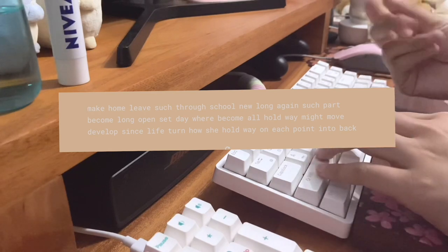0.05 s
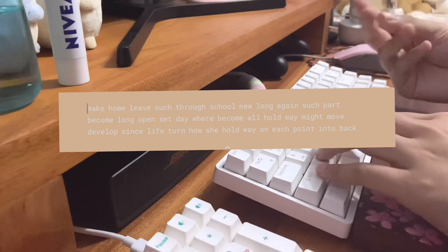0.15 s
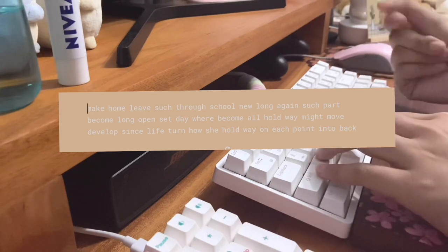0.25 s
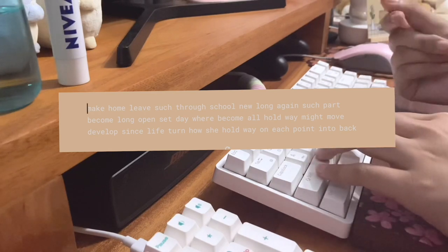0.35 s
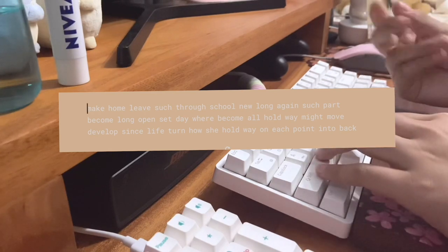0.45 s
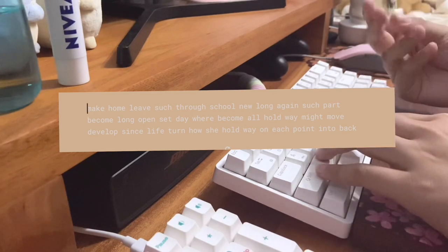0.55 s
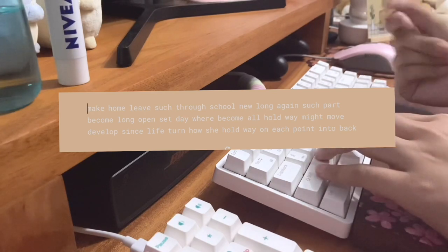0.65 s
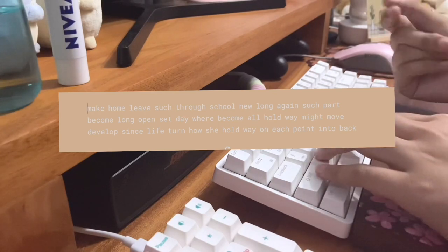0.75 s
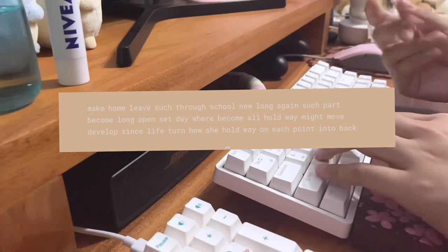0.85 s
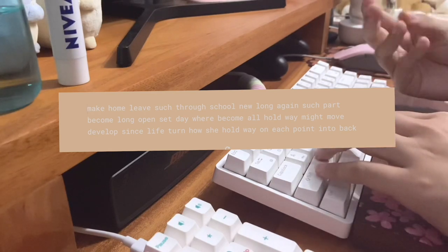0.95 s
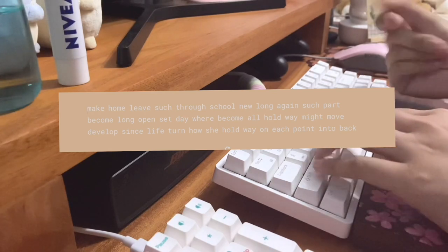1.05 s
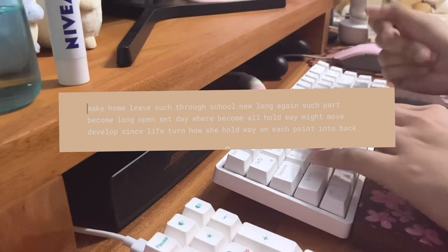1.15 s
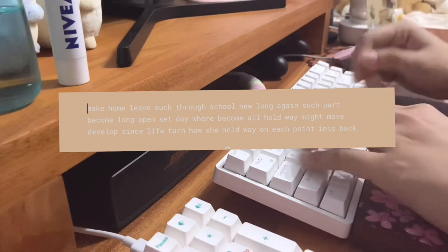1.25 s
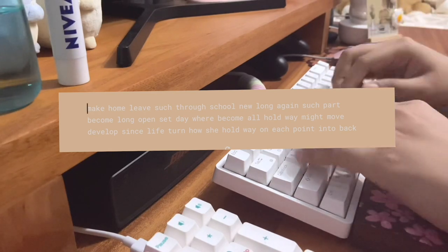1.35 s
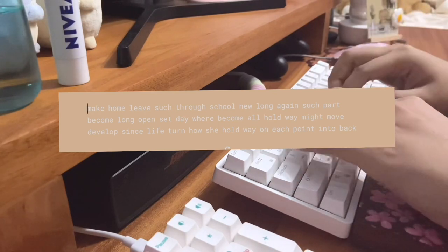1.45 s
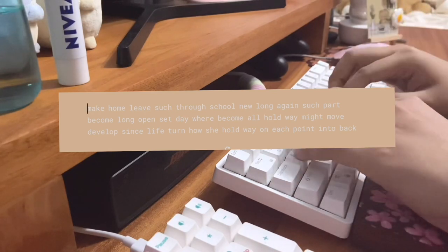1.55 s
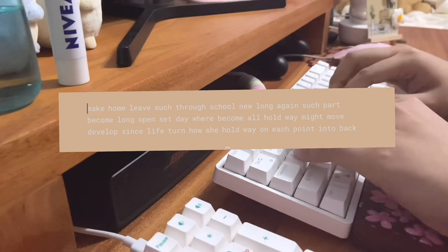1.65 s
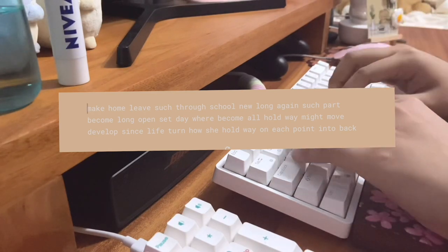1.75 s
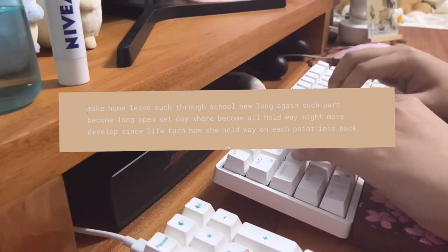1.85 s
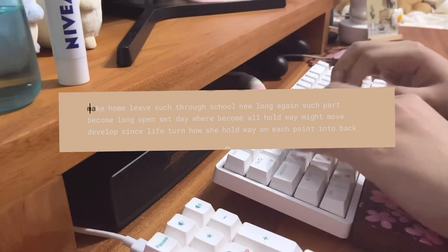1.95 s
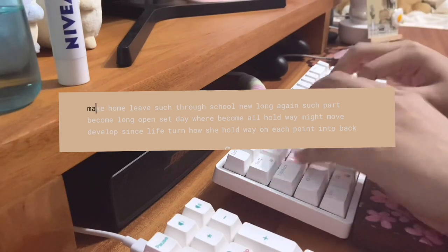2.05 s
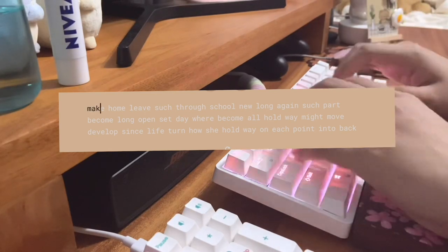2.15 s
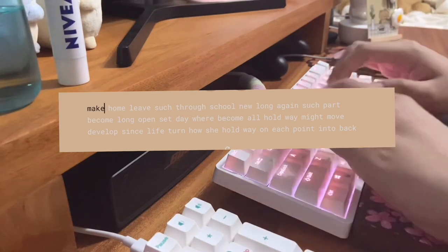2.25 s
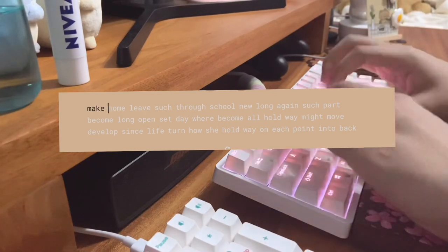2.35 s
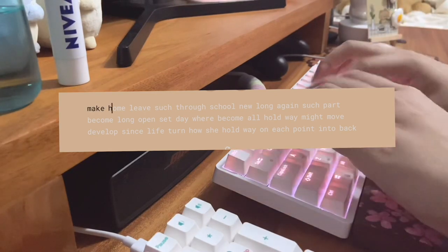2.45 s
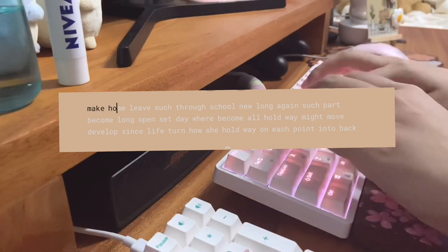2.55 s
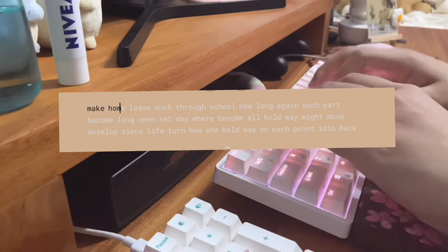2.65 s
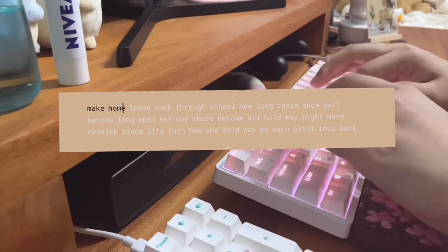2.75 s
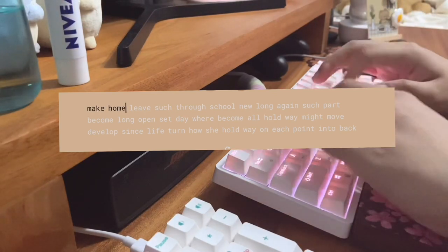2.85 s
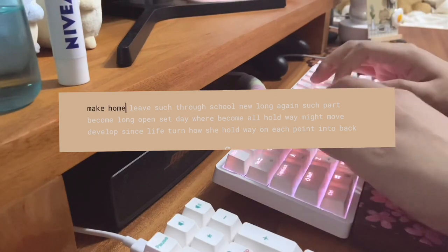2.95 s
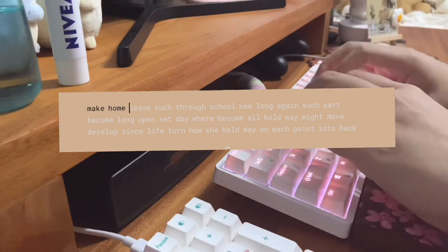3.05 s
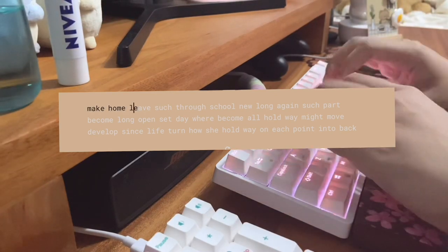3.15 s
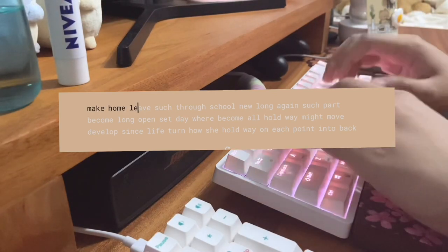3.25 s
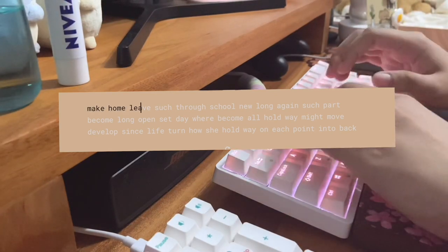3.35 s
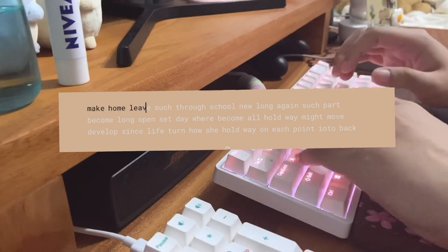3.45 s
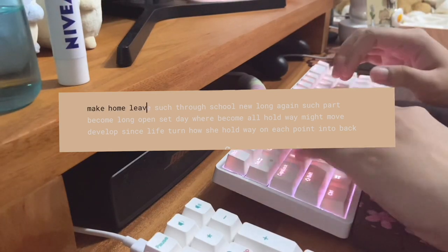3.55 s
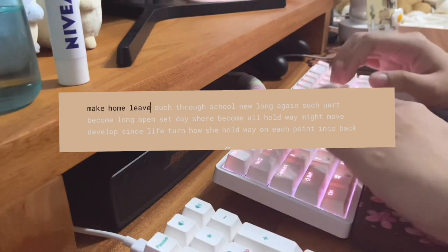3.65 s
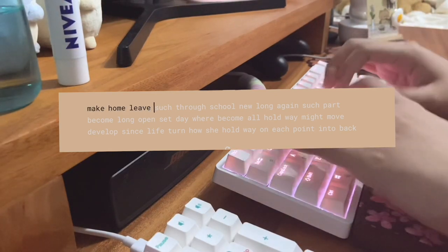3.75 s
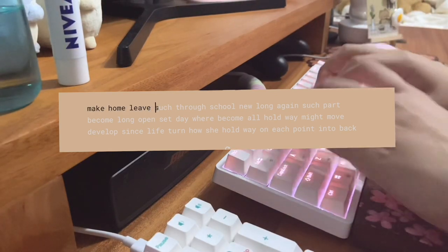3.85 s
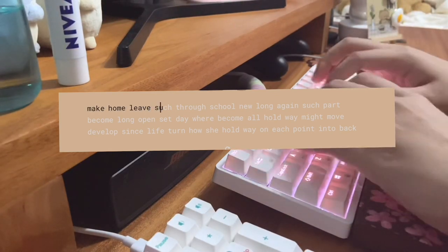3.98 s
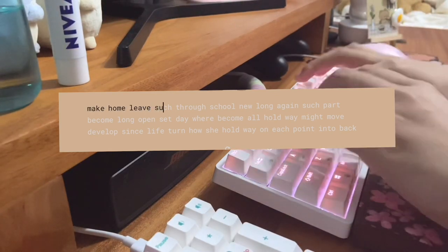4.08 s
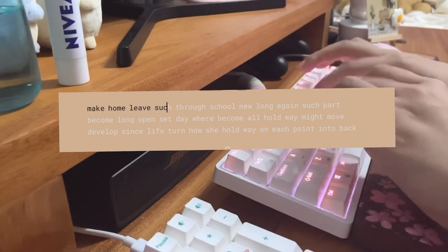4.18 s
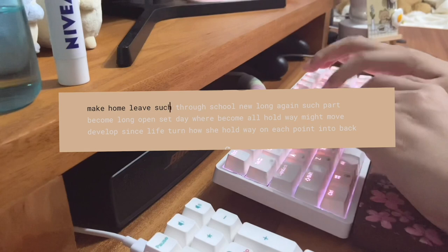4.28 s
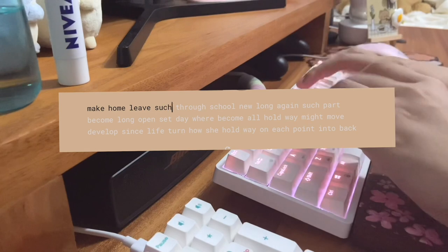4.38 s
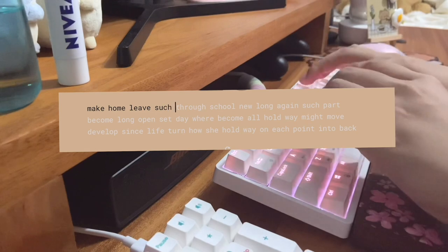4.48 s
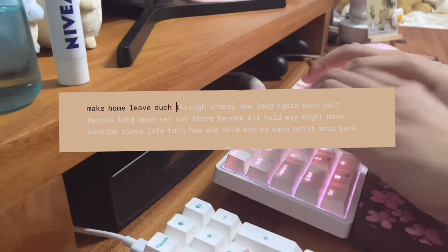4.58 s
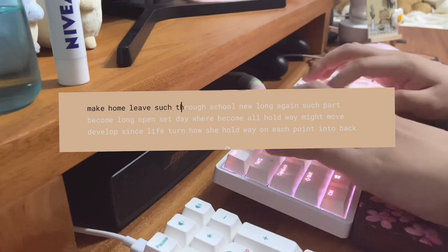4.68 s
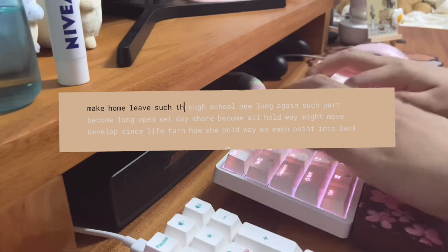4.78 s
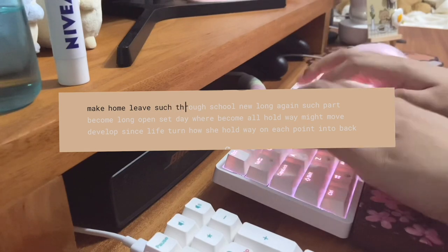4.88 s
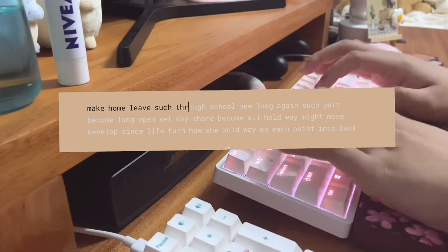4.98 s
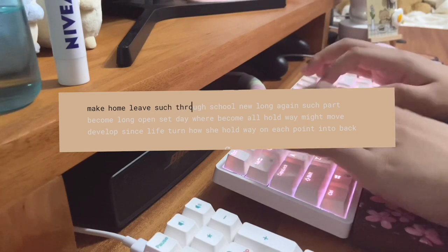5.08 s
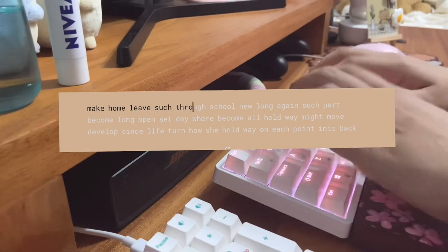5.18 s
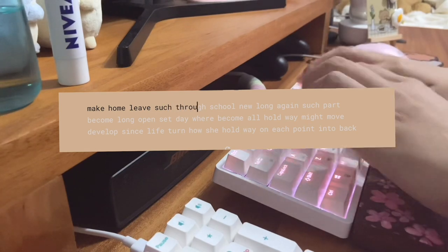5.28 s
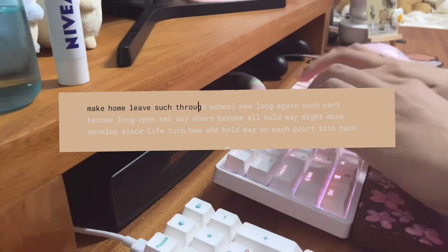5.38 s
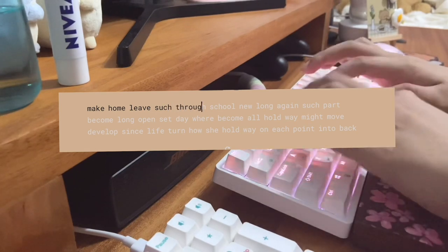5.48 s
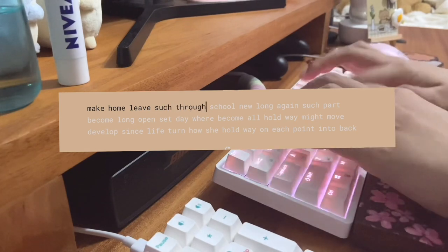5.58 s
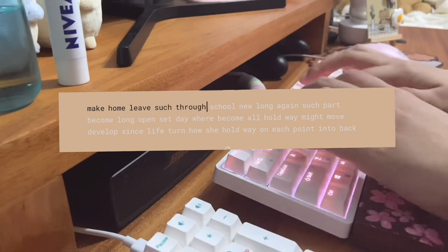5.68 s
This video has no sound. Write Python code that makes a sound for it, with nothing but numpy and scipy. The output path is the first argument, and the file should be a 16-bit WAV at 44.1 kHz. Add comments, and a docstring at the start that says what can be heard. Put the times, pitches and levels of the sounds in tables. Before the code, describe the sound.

Three finger snaps, then quick typing on a mechanical keyboard, with soft desk thumps over a low hum.

```python
"""Over a low hum of appliances come three finger snaps, then quick typing on a small mechanical keyboard.
Each snap is a finger slipping off the thumb and slapping the palm. Each key that hits the bottom or top
of its switch rattles briefly and makes the case, cap, plate and spring ring. Hard strokes boom in the
wooden desk. It is all close by, and a small furnished room answers the snaps and clacks."""
import sys
import numpy as np
from scipy import signal
from scipy.fft import rfft, irfft
from scipy.io import wavfile
from scipy.ndimage import uniform_filter1d

SR = 44100
rng = np.random.default_rng(int(sys.argv[2]) if len(sys.argv) > 2 else 0)


def log_audio(samples):
    """Write samples as a 16-bit WAV file to the path given in sys.argv[1]."""
    # one column per channel
    frames = np.atleast_2d(samples).T
    # limit to full scale, then quantise
    limited = np.clip(frames, -1, 1)
    pcm = np.round(limited * 32767).astype(np.int16)
    wavfile.write(sys.argv[1], SR, pcm)


N = 252252


def undb(db):
    """Turn decibels into a number to multiply by."""
    return np.exp(np.asarray(db, float) * np.log(10) / 20)


def unit(x, size=250):
    """Scale each channel so that its first samples have an average (rms) strength of 1."""
    return x / np.sqrt(np.mean(x[..., :size] ** 2, axis=-1, keepdims=True))


def ring(modes, seconds, scatter_db=0, detune=0, blow=np.ones(1)):
    """A body's own tones (modes), a little different each time; each fades by 60 dB in its time t60."""
    hz, db, t60 = np.transpose(modes)[:, :, None]
    t = np.arange(int(seconds * SR)) / SR
    level_luck, pitch_luck = rng.standard_normal((2, len(modes), 1))
    turn = 2 * np.pi * hz * (1 + detune * pitch_luck)
    # dividing by how well the blow reaches each tone lets it wake them all
    reach = np.abs(np.exp(1j * turn * t[:len(blow)]) @ blow)[:, None]
    fade = undb(db + scatter_db * level_luck - 60 * t / t60)
    return np.sum(fade * np.sin(turn * t) / reach, axis=0)


def rattle(fade_ms, apart, rise_ms=0.78):
    """A run of tiny collisions that dies away; left and right hear it slightly differently."""
    ms = np.arange(900) / SR * 1000
    shape = np.exp(-ms / np.clip(fade_ms, .1, 9)) * np.minimum(ms / rise_ms, 1)
    mid, side = rng.standard_normal((2, len(ms))) * shape
    return np.array([mid + apart * side, mid - apart * side])


def struck(blow, modes, db, scatter_db=2.5, detune=.03):
    """A blow heard through the ring of a body; the lower a body rings, the longer each contact lasts."""
    top_hz, _, longest_t60 = np.max(modes, axis=0)
    blow = uniform_filter1d(blow, size=max(int(SR / top_hz / 1.7), 1), mode="constant")
    body = ring(modes, np.clip(longest_t60, .021, .08), scatter_db, detune, blow.mean(axis=0))
    # small bodies send out the change of their motion as sound
    return undb(db) * unit(signal.fftconvolve(blow, np.diff(body)[None], axes=1))


def add(out, sound, s, pan_db=0):
    """Place a sound at s seconds; pan is the left level minus the right."""
    i = int(s * SR)
    out[:, i:i + sound.shape[-1]] += (sound * undb([[pan_db / 2], [-pan_db / 2]]))[:, :N - i]


def band(x, hz, octaves):
    """Keep only the pitches around hz."""
    edges = np.clip(hz * 2 ** (np.array([-octaves, octaves]) / 2), 5, .49 * SR)
    return signal.sosfilt(signal.butter(2, edges, "bandpass", fs=SR, output="sos"), x)


def noise_pair(size, likeness):
    """Left and right noise: unrelated at likeness 0, the same at 1."""
    mid, side = rng.standard_normal((2, size)) * np.sqrt(1 + np.clip(likeness, 0, 1) * np.array([[1], [-1]]))
    return np.array([mid + side, mid - side]) / np.sqrt(2)


def wander(per_second):
    """A smooth drift from one random value to the next."""
    hold = int(SR / per_second)
    steps = np.repeat(rng.standard_normal(N // hold + 1), hold)
    return uniform_filter1d(uniform_filter1d(steps, hold), hold)[:N]


def hum():
    """Appliances hum: narrow bands of noise swell together and flicker on their own."""
    # background noise: f/Hz, level in each hertz/dB, left-right likeness
    hum_curve = [(30.8, -92, 0.95), (43, -89.5, 0.9), (57.3, -80.5, 0.92), (83.4, -89, 0.97),
                 (135.5, -91.5, 0.92), (182, -89.5, 0.66), (230, -98, 0.9), (265.3, -98, 1),
                 (312, -92, 0.6), (463, -99, 0.5), (616, -107, 0.1), (786, -112, 0), (1140, -110, 0.1),
                 (2350, -122, 0.15), (5650, -129, 0), (11300, -128, .95), (15280, -142, .95)]
    hz, db, likeness = np.transpose(hum_curve)
    out, swell_db = 0, 1.6 * wander(0.55)
    for f in 25 * 2 ** np.arange(0, 9.5, 1 / 3):
        band_db, alike = (np.interp(np.log(f), np.log(hz), column) for column in (db, likeness))
        flicker_db = 1.5 * wander(8)
        out = out + undb(band_db + swell_db + flicker_db) * band(noise_pair(N, alike), f, 1 / 3)
    return out * np.sqrt(SR / 2)


def finger_snaps():
    """The finger scrapes off the thumb and slaps the palm; the jolt goes down the arm into the desk."""
    # snaps: t/s, palm level/dB, finger level/dB, jolt level/dB, pan/dB
    snaps = [(0.0351, -43.5, -36.5, -53, 8.5), (0.4467, -40.5, -33, -54, 8),
             (0.8511, -40.5, -32.5, -71.5, 7.5)]
    # skin slipping just before a snap: t/s, level/dB
    slips = [(0.417, -70.5), (0.823, -66.5)]
    # tones of each body: f/Hz, relative level/dB, t60/s
    palm = [(420, -38.5, 0.052), (815, 3.5, 0.015), (2050, -5, 0.0072), (2857, 5.5, 0.0043),
            (3450, 1, 0.0015)]
    finger = [(4090, -15, 0.0019), (5064, 2, 0.007), (6470, 2, 0.0027), (7150, 6.5, 0.0039),
              (9070, -8.5, .003), (9270, -6.5, 0.0015), (13200, 2, 0.00096), (14500, -27.5, 0.0031)]
    desk_under_elbow = [(70.2, 0, 0.077)]
    # what the walls hear of a snap: f/Hz, width/octaves, gain/dB
    spread = [(801, 0.66, -2), (2690, 0.86, 2.5), (5000, 0.61, -4), (6870, 0.14, -6), (11440, 0.76, -10.5)]
    out, blows = np.zeros((2, N)), np.zeros((len(spread), N))
    for s, palm_db, finger_db, jolt_db, pan_db in snaps:
        slap = .2 * rattle(fade_ms=.6, apart=.3, rise_ms=1.1)
        slap[:, 55] -= 1  # the hit, after about a millisecond of scraping
        add(out, struck(slap, palm, palm_db, scatter_db=0.59, detune=0), s, pan_db)
        add(out, struck(slap, finger, finger_db, scatter_db=0.74, detune=0), s, .4 * pan_db)
        add(out, undb(jolt_db) * unit(ring(desk_under_elbow, .2), size=900), s + 0.011)
        blows[:, int(s * SR)] = undb([palm_db] * 2 + [finger_db] * 3)
    for s, db in slips:
        add(out, struck(rattle(fade_ms=9, apart=.25), palm + finger, db), s)
    return out, wall_clicks(blows, spread)


def wall_clicks(blows, spread):
    """Over all directions single tones even out: the walls hear each part as a plain click in its band."""
    return sum(band(blow, hz, octaves) * undb(db) * np.sqrt(250 * SR / 2 / hz / octaves)
               for blow, (hz, octaves, db) in zip(blows, spread))


def room(x):
    """The room answers with a few near echoes, a wash of fading sound and a faint, longer afterglow."""
    # the wash, band by band: f/Hz, weight/dB, t60/s, left-right likeness
    wash = [(700, -38, 0.11, 0.6), (1314, -11.5, 0.29, 0), (2770, -9.5, 0.24, 0.53), (5070, -5, 0.24, 0.39),
            (11000, 1.5, 0.28, 0.96)]
    # echoes off desk and shelf: delay/s, level/dB
    echoes = [(.005, -37), (0.01, -22), (0.023, -30.5)]
    t = np.arange(int(.7 * SR)) / SR
    tail, afterglow = 0, undb(-24.5 - 60 * t / 0.69)
    for hz, db, t60, likeness in wash:
        noise = band(noise_pair(len(t), likeness), hz, octaves=0.94)
        fade = undb(-60 * t / t60) + afterglow
        tail = tail + noise * undb(db) * fade / np.sqrt(hz * t60)
    tail = tail * np.minimum(t / 0.002, 1)  # builds up in 2 ms
    for s, db in echoes:
        tail[:, int(s * SR)] += undb(db)
    return signal.fftconvolve(x[None], tail, axes=1)[:, :N]


def typing():
    """A key's rattle rings case, caps and plate; the hard contact ticks and fizzes; the spring pings on."""
    # key hits: t/s, strength/dB, cap f/Hz, hollowness/dB, depth into the plate/dB, hardness/dB, rattle/ms
    hits = [(1.0727, -54, 1180, -26, -5, -5, 9), (1.0828, -43, 1650, -17, -8, -10, 3.7),
            (1.0905, -46.5, 1150, -10, -7, -4, 9), (1.1011, -40, 1640, -9.5, -5, -5.5, 1.6),
            (1.1715, -36, 1490, -10.5, -5.5, -8, 4.6), (1.2358, -49, 1500, -29, -25, -23, 2.1),
            (1.3917, -66, 1250, -16, -24, -21.5, 2.4), (1.4064, -56.5, 1420, -22, -21, -27, 2.8),
            (1.434, -62, 1425, -13, -12, -24, 2.7), (1.455, -58, 1340, -11, -16, -25, 2),
            (1.4748, -50.5, 1690, -2, -17, -26, 2.6), (1.6858, -55.5, 1580, -33, -18.5, -32.5, 3.3),
            (1.7814, -42.5, 2120, -5, -10.5, -4.5, 3.3), (1.7906, -39, 1450, -25, -7.5, -12, 2.2),
            (1.8004, -46.5, 1460, -6, -9, -21, 4.7), (1.8447, -44.5, 1560, -7, 1, 1.5, 1.6),
            (1.8676, -38, 1280, -4, -6, -11, 3), (1.8742, -34, 1350, -7, -3.5, -9, 2.6),
            (1.9526, -45, 1750, -10, -2.5, -8, 3.8), (1.96, -30, 1720, -16, -5.5, -6.5, 2.4),
            (2.0402, -37.5, 1680, -28, -3.5, -1.5, 2.6), (2.0453, -36, 1690, -17, -12, -26, 2.3),
            (2.062, -48, 1630, -15, -1, 1, 3.8), (2.0805, -35.5, 1610, -14, -7, -19, 2.5),
            (2.1577, -46, 1570, -2, -5, -14, 7.4), (2.17, -36, 1624, -2, -1.5, -0.5, 5.1),
            (2.1822, -37.5, 1830, -26, -14, -22, 3), (2.2506, -43.5, 1180, -7, -7.5, -16, 3.4),
            (2.2983, -45.5, 1740, -20, -5, -4.5, 5.2), (2.3088, -31.5, 1780, -17, -8, -11, 1.5),
            (2.3689, -48, 1480, -10, -8, -14, 3.5), (2.377, -47.5, 1230, -14, -7, -5, 3.3),
            (2.3875, -33.5, 1360, -22, -15, -12.5, 3.4), (2.3994, -31, 1760, -15, -11, -18, 2.24),
            (2.491, -34.5, 1560, -14, -17, -15.5, 4.2), (2.526, -37.5, 2140, -2, -4.5, -5, 3.3),
            (2.5334, -34, 1950, -11, -7.5, -6.5, 4.3), (2.6012, -45, 1550, -2, -5, -13, 3),
            (2.6143, -39, 1400, -9, -5.5, -12, 5.5), (2.6499, -33.5, 1590, -18, -8, -16.5, 2.7),
            (2.7463, -46.5, 1460, -30, -12, 3.5, 1.8), (2.7548, -30.5, 1505, -15, -9, -13, 4.3),
            (2.839, -41, 1330, -21, -4, -17, 5.6), (2.848, -38, 2040, -5.5, -5, -2, 3.2),
            (2.9299, -43.5, 1590, 1, 3, -4.5, 3.9), (2.974, -45.5, 1440, -8, -4, -7, 2.1),
            (2.9832, -34.5, 1440, -15, -3, -4.5, 2.2), (2.992, -51.5, 1480, -16, 6.5, -16, 3),
            (3.0597, -38.5, 1350, -22, -8, -13.5, 3.7), (3.0633, -35, 1480, -36, -18, -28, 3.5),
            (3.08, -33.5, 1640, -14, -7, -17, 1.8), (3.1881, -39.5, 1960, -18, -5, -4, 2.5),
            (3.2099, -35.5, 1790, -32, -12, -21, 5.8), (3.2148, -33, 1400, -12, -8, -21, 3),
            (3.286, -44.5, 1930, -5.5, -15, -9, 3.5), (3.2938, -53.5, 1610, -4, -1, -8, 1.5),
            (3.3308, -34.5, 1470, -20, -9.5, -18.5, 1.7), (3.356, -34.5, 1330, -11, -9.5, -7.5, 3.8),
            (3.3616, -37.5, 1500, -26, -21, -21, 3), (3.444, -36, 1770, -23, -14, -17, 3.5),
            (3.4529, -37, 1195, -23, -14, -11, 3), (3.476, -36.5, 1480, -27, -5, -7, 3.2),
            (3.488, -34, 2090, -24, -5.5, -15, 4.5), (3.567, -61, 1320, -17, 3, -13, 1.6),
            (3.59, -32, 1810, -11, -7.5, -10.5, 2), (3.6029, -35, 1435, -0.5, -1.5, -3, 1.5),
            (3.6923, -39, 1200, -25, -4, -10.5, 2.8), (3.7313, -43.5, 2200, -2, 1.5, -6.5, 1.4),
            (3.7478, -39, 1440, -13, -2.5, -10.5, 2.2), (3.8432, -31, 1896, -10, -4, -12, 2),
            (3.8686, -40, 1700, -31, -15, -12, 4.4), (3.8915, -51, 1760, -23, -8, -7, 2.6),
            (3.9399, -35.5, 1590, -21, -12.5, -20, 1.1), (3.9576, -40, 1730, -2.5, -6.5, -6.5, 2.6),
            (4.0197, -45, 1820, -15, -5.5, -5, 3.5), (4.0447, -44.5, 1490, -3.5, -10.5, -18, 3.6),
            (4.1389, -37.5, 1180, -3, -15, -9.5, 2.2), (4.1496, -51, 1190, -10, -2, 0.5, 1.9),
            (4.1583, -31.5, 1642, -14, -9, -5, 2.6), (4.233, -35, 1686, -18, -15, -13.5, 3.5),
            (4.284, -46, 1490, 0, -5, -8, 3.5), (4.295, -50.5, 1930, -2, 3, 10, 4),
            (4.346, -63.5, 1490, 8, 6.5, 2, 3), (4.3864, -39, 1180, -10.5, -6, -16, 2),
            (4.4693, -46.5, 1310, -8, -8.5, 0, 4.4), (4.4928, -52, 1610, -6, -10, -21, 2.3),
            (4.5415, -38, 1450, -16, -6, -10, 2.6), (4.5537, -31.5, 1710, -11.5, -13.5, -14, 5),
            (4.629, -38, 1623, -14, -13.5, -15.5, 3.1), (4.6653, -48, 1380, -20, -19, -20, 3.3),
            (4.781, -41.5, 1330, -4, -5.5, -9, 1.8), (4.789, -51, 1620, -20, -17, -26, 4.1),
            (4.8846, -56, 1550, -10, -7, -1, 1.6), (4.896, -38, 1490, -5.5, -8, -4.5, 3.2),
            (4.9659, -47.5, 1500, -20, -12, -11, 5.4), (4.979, -37, 1156, -35, -4.5, -13.5, 1.9),
            (5.0686, -53, 1730, -20, -24, -17, 3.7), (5.0924, -39.5, 1700, -20, -12, -12, 2.8),
            (5.1016, -40.5, 1750, -22, -10, -16, 4.1), (5.1138, -33, 1610, -14, -7, -13, 2.3),
            (5.1984, -35.5, 1390, -13, -9.5, -13, 2.1), (5.2666, -54, 1170, 5, -6, -2.5, 2.3),
            (5.2902, -40.5, 1570, -24, -11, -17.5, 1.8), (5.3747, -40.5, 1460, -16, -5.5, -11.5, 3.8),
            (5.4015, -35, 1700, -8, -11.5, -10, 3.4), (5.411, -40, 1390, -13, -8, -25, 2.2),
            (5.4699, -35.5, 1620, -13, -18, -13.5, 4.4), (5.5624, -51, 1210, -14, -4, -6, 6.7),
            (5.5733, -34, 1640, -0.5, -7, -1.5, 5.4), (5.6513, -36, 1160, -6, -9, -14.5, 1.7),
            (5.665, -43.5, 2070, -9, -2.5, -14, 1.9), (5.693, -38.5, 1553, -17, -0.5, -6.5, 2.4)]
    # tones of each part: f/Hz, relative level/dB, t60/s
    case = [(759.6, 28, 0.036), (865, 28.5, 0.014), (1028.4, 16, 0.11)]
    shells = [(1296, -46, 0.11), (1397, 5, 0.086), (1662, 8, 0.034), (1750, 14.5, 0.018), (1990, 3.5, 0.01)]  # of caps and switches, common to all keys
    plate = [(2321, 22, 0.008), (2773, 11.5, 0.028), (3178, 15, 0.013), (3430, 7.5, 0.033),
             (3755, 3, 0.0093), (4216, -7.5, 0.0092)]
    tick = [(4580, -8.5, 0.0051), (5210, 12.5, 0.0022), (6140, -36.5, 0.0056), (6974, 14, 0.0022),
            (7770, -11, 0.017), (8013, 7, 0.0055)]
    fizz = [(9340, 1.5, 0.0069), (10000, -22, 0.0041), (11400, 11, 0.0013), (11300, -22, 0.01),
            (15800, -49, 0.0054)]
    spring = [(1400, -4, 0.058), (1640, 3.5, 0.067), (3160, 2, 0.16), (3220, -2, 0.18), (4900, -8, 0.09)]
    # what the walls hear of case, cap, plate, tick and fizz: f/Hz, width/octaves, gain/dB
    spread = [(737, 0.35, 9), (1580, 0.77, 4), (2810, 0.55, 0.5), (5360, 1.3, -1.5), (11400, 0.87, -4)]
    out, blows = np.zeros((2, N)), np.zeros((len(spread), N))
    for s, db, cap_hz, hollow_db, depth_db, hard_db, rattle_ms in hits:
        case_db, cap_db, plate_db = db - 7 + hollow_db, db - 10, db - 2.5 + depth_db
        tick_db, fizz_db = db - 5.5 + hard_db, db - 10.5 + hard_db
        pan_db = 1.4 + 0.5 * rng.standard_normal()
        blow = rattle(1.11 * rattle_ms, apart=0.31, rise_ms=1.18)
        crack = rattle(.8 * rattle_ms, apart=.4, rise_ms=1.1)
        cap = [(cap_hz, 0, .03)]
        for modes, part_db in [(case, case_db), (shells, cap_db - 5), (cap, cap_db), (plate, plate_db)]:
            add(out, struck(blow, modes, part_db), s, pan_db)
        for modes, part_db in [(tick, tick_db), (fizz, fizz_db)]:
            add(out, struck(crack, modes, part_db), s, 0.34 * pan_db)  # the treble leans less to one side
        ping = unit(ring(spring, .2, scatter_db=4, detune=.012))  # every key has its own spring
        add(out, undb(plate_db - 20) * ping, s)
        signs = rng.choice([-1, 1], size=5)
        blows[:, int(s * SR)] = undb([case_db, cap_db, plate_db, tick_db, fizz_db]) * signs
    no_bass = signal.butter(4, 660, "highpass", fs=SR, output="sos")  # small parts give off no bass
    return signal.sosfilt(no_bass, out + long_bar()), signal.sosfilt(no_bass, wall_clicks(blows, spread))


def desk_thumps():
    """The thin panel knocks first; the keyboard's soft feet then push the desk board, which booms on."""
    # thumps: t/s, peak level of the board/dB
    thumps = [(1.803, -43), (1.973, -45.5), (2.082, -55.5), (2.183, -39), (2.312, -51), (2.407, -52.5),
              (2.541, -44.5), (2.614, -48.5), (2.862, -42), (2.933, -46), (2.994, -51), (3.227, -54.5),
              (3.339, -52), (3.454, -56), (3.616, -39), (3.702, -45.5), (3.758, -55.5), (3.849, -57.5),
              (4.032, -53.5), (4.17, -52.5), (4.309, -47), (4.393, -52), (4.563, -58.5), (4.98, -58),
              (5.121, -55), (5.405, -57), (5.48, -60), (5.587, -37), (5.658, -43), (5.702, -49)]
    # tones of the heavy board and the thin panel: f/Hz, relative level/dB, t60/s
    board = [(107, -23, 0.17), (123.8, 0.5, 0.19), (135, -10.5, 0.33), (162, -6.5, 0.043)]
    panel = [(232.6, -13, 0.11), (273, -8.5, 0.17), (299, 2, 0.23), (352.4, 4, 0.18), (382, 1.5, 0.18),
             (462, 6, 0.06), (512, -13, 0.14)]
    out, push = np.zeros((2, N)), np.hanning(int(0.0031 * SR))
    for s, board_db in thumps:
        boom = np.convolve(push, ring(board, .22, scatter_db=4, detune=.03))
        boom *= 1 - np.exp(-np.arange(len(boom)) / SR / 0.0061)  # the board takes a cycle to get going
        add(out, undb(board_db) * boom / np.max(np.abs(boom)), s - .004)
        panel_db = -53.5 + 1.19 * (board_db + 45)  # harder thumps bring out more of the panel
        rings = [ring(panel, .2, scatter_db=5, detune=.04) for _ in range(2)]
        mid, side = (unit(np.convolve(push[::4], tones), size=900) for tones in rings)
        add(out, undb(panel_db) * np.array([mid + 0.44 * side, mid - 0.44 * side]), s - .009)
    return out


def long_bar():
    """The keyboard's long bar lands, and the wire that steadies it rings."""
    # landings: t/s, level/dB
    landings = [(2.173, -67), (2.849, -50), (3.604, -44.5), (4.296, -47.5), (5.575, -52)]
    # tones of the wire: f/Hz, relative level/dB, t60/s
    wire = [(4440, 1, 0.032), (4800, -3, 0.053), (5090, 8, .03)]
    out = np.zeros((2, N))
    for s, db in landings:
        add(out, struck(rattle(fade_ms=1.5, apart=0.48), wire, db, scatter_db=1.7, detune=.01), s)
    return out


def scene():
    """Hands, keyboard and desk in the room, over the hum."""
    snaps, snaps_at_walls = finger_snaps()
    clacks, clacks_at_walls = typing()
    return snaps + clacks + room(snaps_at_walls + clacks_at_walls) + desk_thumps() + hum()


def record(dry):
    """In two treble bands the right channel runs out of step with the left; deep bass and top are cut."""
    # bands where the right channel's wave is upside down: lower f/Hz, upper f/Hz
    flipped_bands = [(8300, 10010), (12500, 14170)]
    hz = np.arange(N // 2 + 1) * SR / N
    half_turns = sum(np.clip((hz - edge_hz) / 400 + .5, 0, 1) for edge_hz in np.ravel(flipped_bands))
    right = irfft(rfft(dry[1]) * np.exp(-1j * np.pi * half_turns), N)
    bass_cut = signal.butter(4, 42, "highpass", fs=SR, output="sos")
    top_cut = signal.ellip(10, .2, 80, 16500, fs=SR, output="sos")
    return signal.sosfilt(top_cut, signal.sosfilt(bass_cut, np.array([dry[0], right])))


dry = scene()
out = record(dry)
log_audio(out)
```